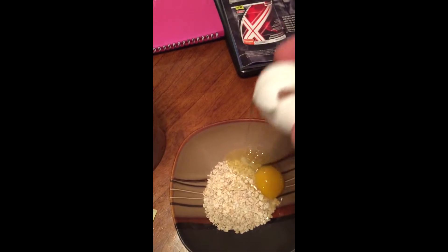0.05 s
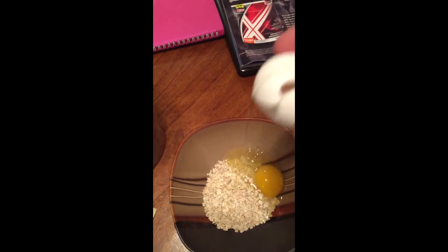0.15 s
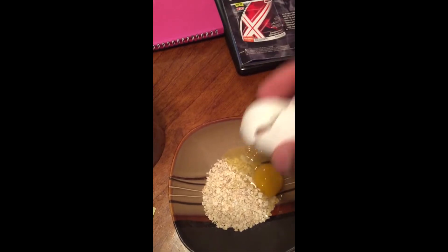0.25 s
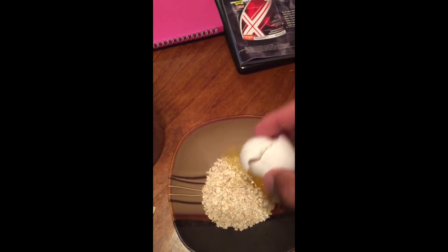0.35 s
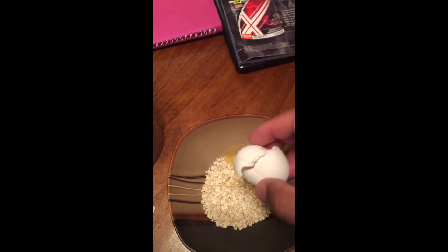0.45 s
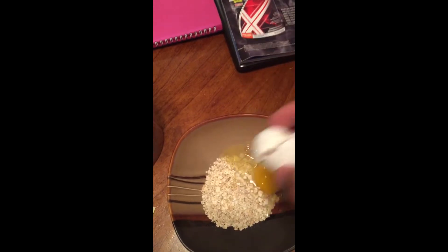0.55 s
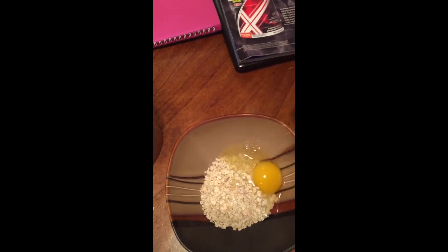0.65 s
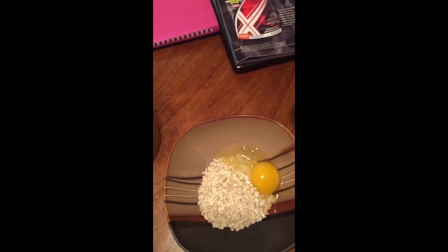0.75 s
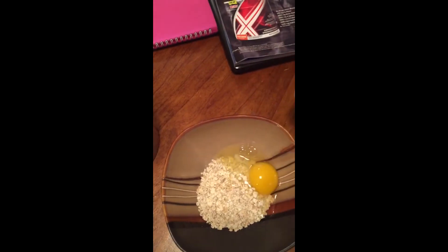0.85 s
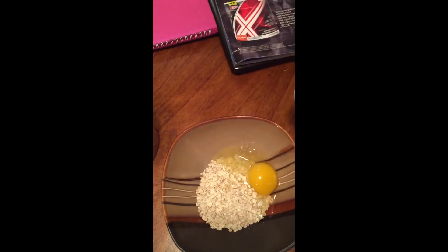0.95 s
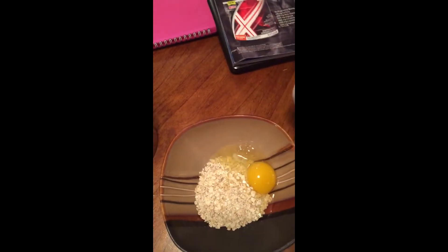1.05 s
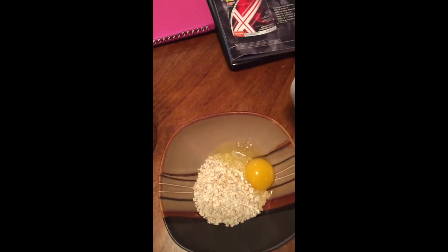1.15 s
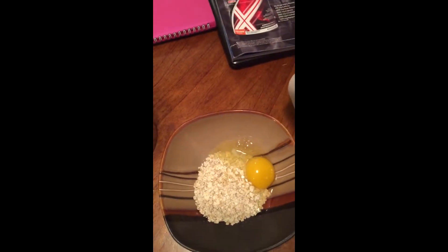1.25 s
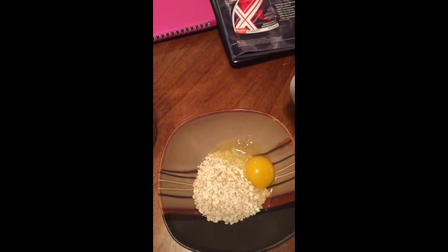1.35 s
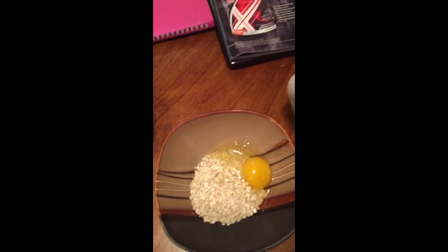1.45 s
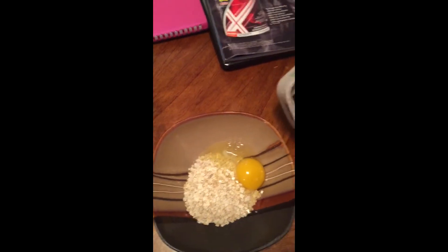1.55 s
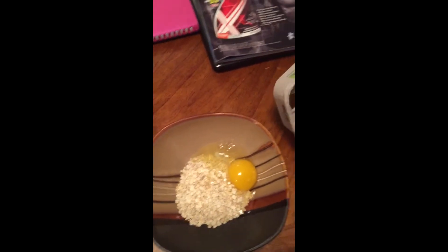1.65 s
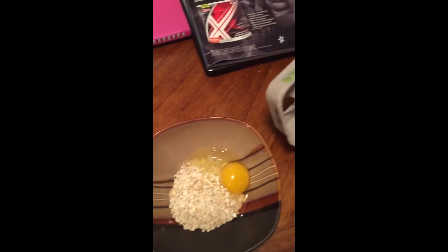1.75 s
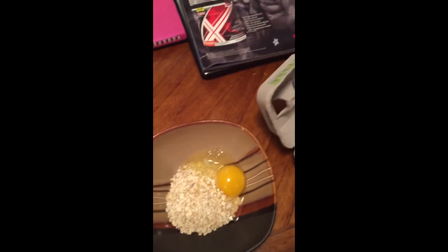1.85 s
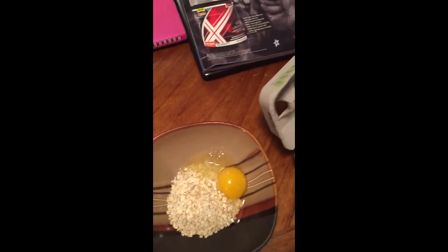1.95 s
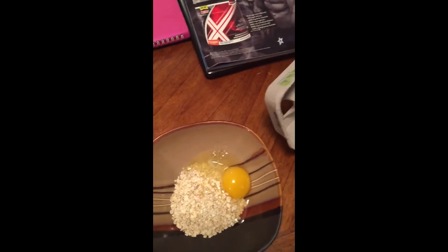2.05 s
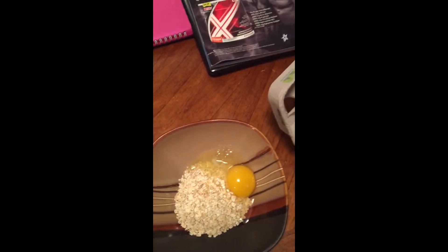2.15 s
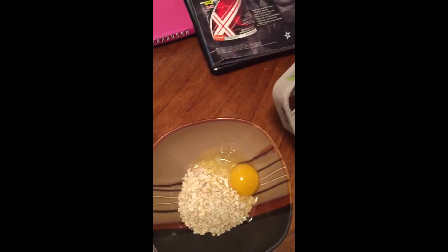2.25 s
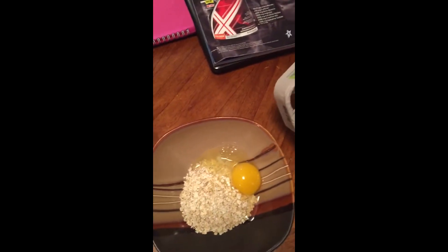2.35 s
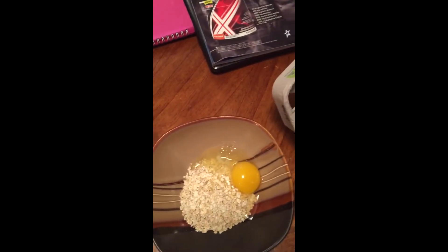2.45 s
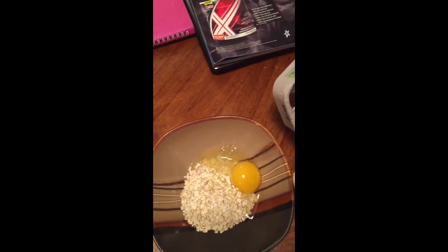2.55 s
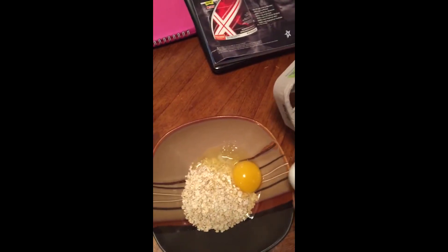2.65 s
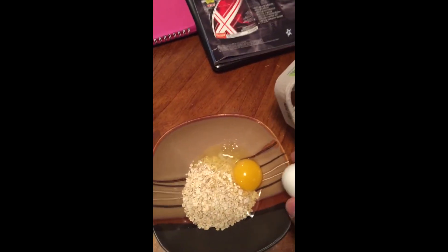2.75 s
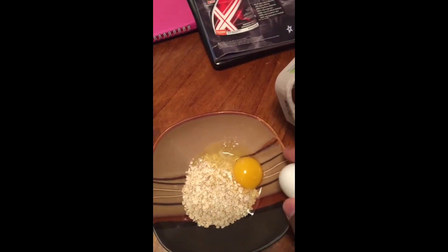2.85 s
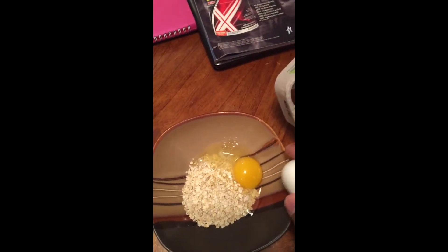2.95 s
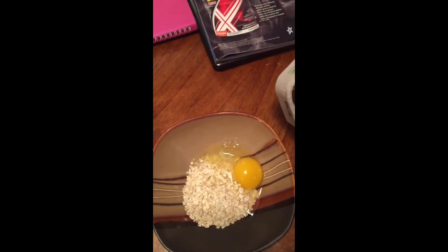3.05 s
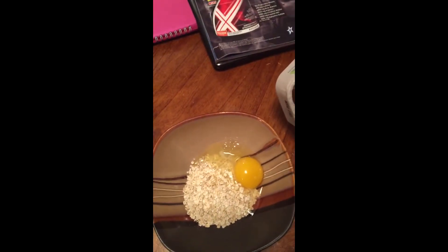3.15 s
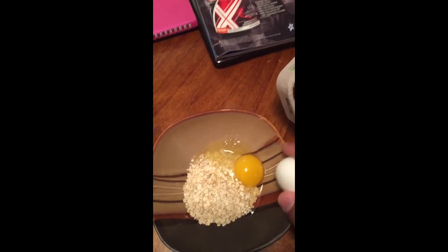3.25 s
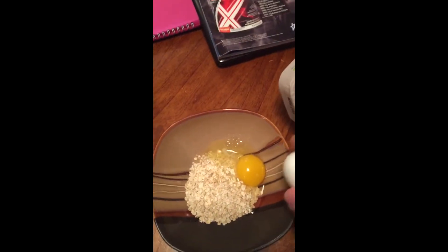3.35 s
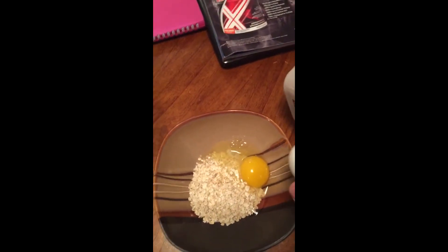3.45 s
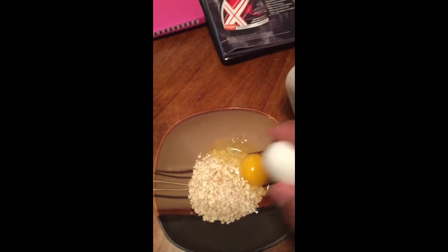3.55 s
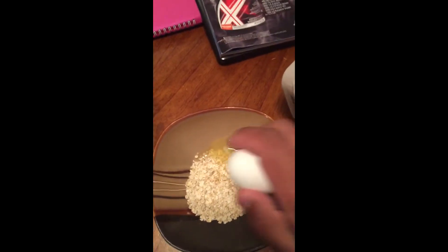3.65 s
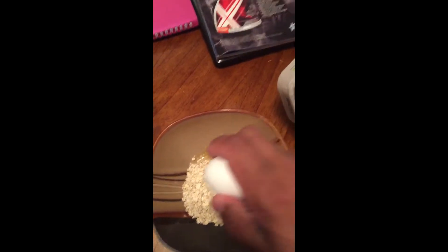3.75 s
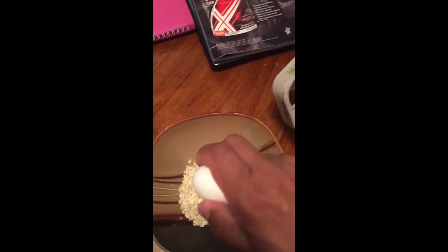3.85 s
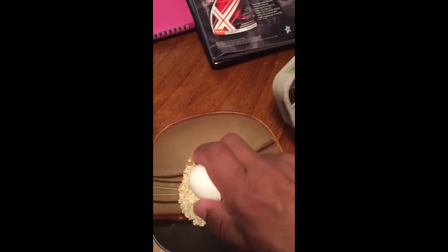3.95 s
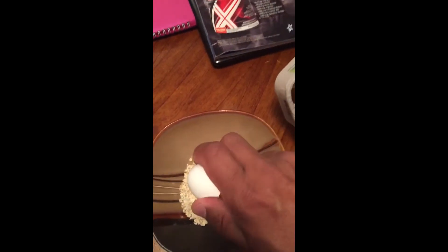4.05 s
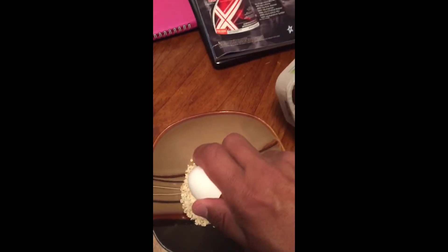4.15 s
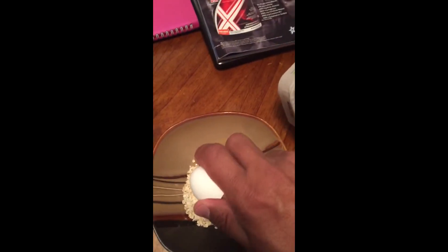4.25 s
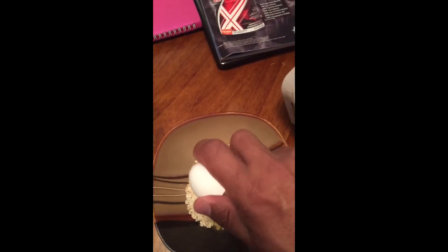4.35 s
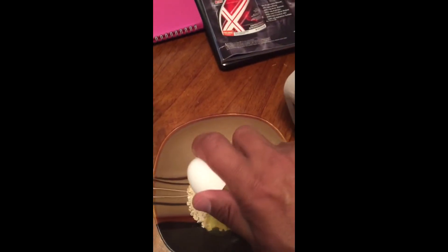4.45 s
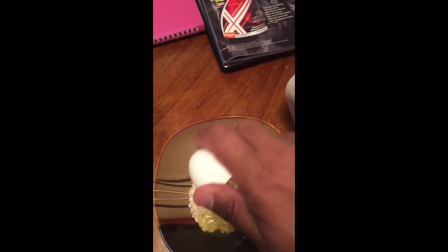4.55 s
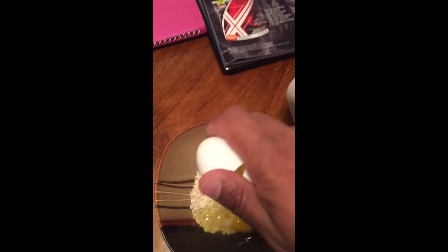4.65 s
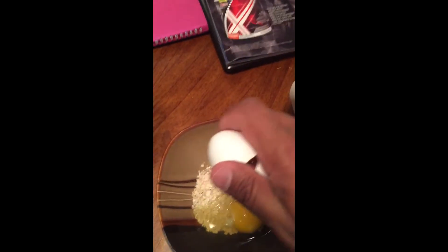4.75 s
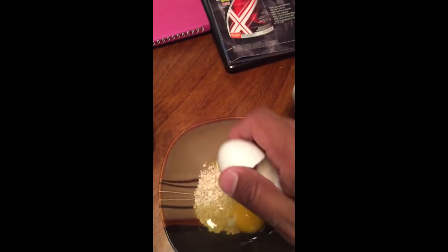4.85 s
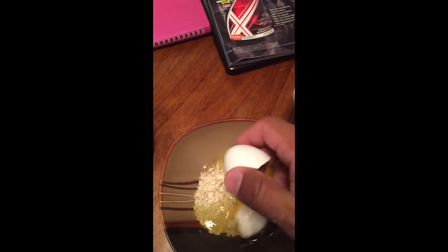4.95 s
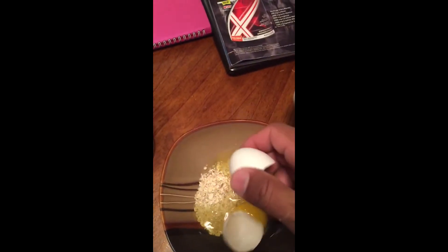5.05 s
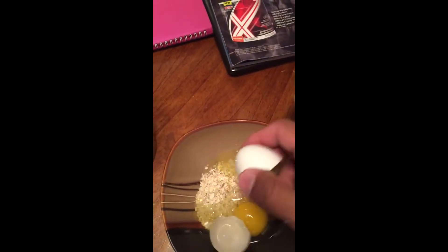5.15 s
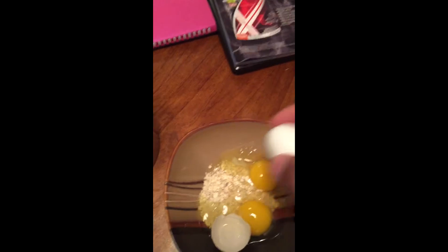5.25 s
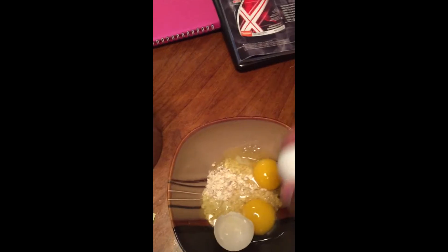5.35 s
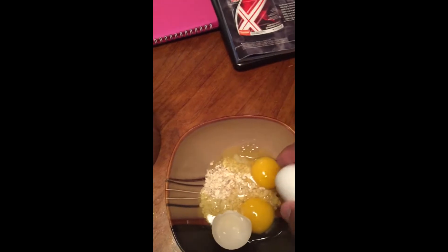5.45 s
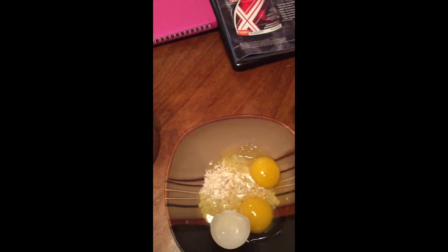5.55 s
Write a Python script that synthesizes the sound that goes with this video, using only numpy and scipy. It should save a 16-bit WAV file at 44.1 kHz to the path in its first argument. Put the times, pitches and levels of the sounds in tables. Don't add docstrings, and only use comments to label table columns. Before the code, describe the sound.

A dry shell tick, gritty carton scrape, two hard egg knocks on a ringing bowl and table, then crisp shell cracks.

```python
import sys
import numpy as np
from scipy import signal
from scipy.fft import rfft, irfft
from scipy.io import wavfile
from scipy.ndimage import uniform_filter1d

SR = 44100
rng = np.random.default_rng(int(sys.argv[2]) if len(sys.argv) > 2 else 0)


def voltage_ratio(level):
    return 10 ** (np.asarray(level, float) / 20)


def log_audio(samples):
    frames = np.atleast_2d(samples).T
    limited = np.clip(frames, -1, 1)
    pcm = np.round(limited * 32767).astype(np.int16)
    wavfile.write(sys.argv[1], SR, pcm)


N = 247048

# (frequency [Hz], density [dB per Hz])
ROOM_TONE = [(24, -21), (40, -8), (64, 1.5), (87, -30.5), (109, -5.5), (151, -7.5), (199, -5.5), (392, -17),
             (542, -11.5), (615, -17), (663, -23), (1520, -26.5), (2210, -31.5), (13400, -45.5),
             (16000, -46)]
# (frequency [Hz], width [Hz], level [dB])
FRIDGE_BANDS = [(55.9, 17, -67), (120.94, 9, -66.5), (194.2, 82, -64), (304.7, 14, -76.5), (550.7, 41, -67),
                (970, 100, -76.5), (1652, 77, -81.5)]
# (frequency [Hz], t60 [s])
ROOM_DECAY = [(150, 1), (400, 0.6), (1000, 0.32), (2500, 0.44), (6000, 0.31), (13000, 0.029)]
# (time [s], length [s], level [dB])
SKIN_SQUEAKS = [
    (1.384, 0.013, -69),
    (1.46, 0.022, -78),
    (1.634, 0.013, -66),
    (5.412, .01, -71),
]
# (frequency [Hz], density [dB per Hz])
FLAKE_COLOUR = [(710, -39.5), (1200, -2.5), (1380, -11.5), (2330, -11.5), (3050, -17.5), (4830, -9),
                (9570, -18), (14500, -12), (15500, -20)]
# (frequency [Hz], density [dB per Hz])
SKIN_COLOUR = [(3500, -9), (5700, -12.5), (6800, -11), (8000, -4.5), (10500, -13), (13000, -10.5),
               (15500, -3)]
# (time [s], rise [s], fall [s], level [dB])
FLAKE_SHOWERS = [(3.79, 0.02, .03, -64.5), (3.93, .04, 0.089, -56), (4.06, 0.077, 0.034, -54),
                 (4.15, 0.11, 0.21, -59), (4.5, 0.55, 0.11, -73.5), (4.8, .7, 0.52, -75),
                 (5.25, 0.077, 0.14, -58.5), (5.49, 0.17, 0.1, -64.5)]
# (time [s], rise [s], fall [s], level [dB])
SKIN_BRUSHES = [(.876, 0.023, .035, -60), (1.36, .012, .022, -72), (1.49, .06, .022, -74),
                (2.168, 0.074, 0.053, -66), (2.29, 0.12, .16, -74), (2.41, 0.052, .04, -66),
                (2.904, .03, 0.025, -69)]
# (time [s], rise [s], fall [s], level [dB])
CARTON_STROKES = [
    (1.4, 0.11, 0.068, -67),
    (1.514, 0.054, 0.039, -54),
    (1.6, 0.13, 0.14, -53),
    (1.748, 0.074, 0.028, -47),
    (1.802, 0.069, 0.022, -44.5),
]
# (frequency [Hz], density [dB per Hz])
PULP_COLOUR = [(290, -13), (500, -13.5), (891, -4), (1100, -7.5), (1220, -2.5), (1560, -7), (1770, -12),
               (1910, -8), (5000, -17), (6500, -18), (11000, -120)]
# (frequency [Hz], level [dB])
CUP_HOLLOWS = [(900, 1), (1250, 3), (1800, 0), (2300, -2), (2800, 0), (3300, -1), (3800, -2), (4800, -8),
               (6300, -11)]
# (time [s], table level [dB], bowl level [dB], splinter level [dB], contact [ms])
KNOCK_ONE = [(2.823, -24, -56.5, -28.5, .35), (2.8255, -11.5, -37, -64, .45), (2.8581, -21, -47, -63, 0.9),
             (2.905, -45, -53, -65, 1.), (2.9315, -38, -70, -75, 1.), (3.003, -42, -54, -72, 0.6),
             (3.012, -36, -66, -75, .8), (3.033, -39, -68, -80, .8), (3.0519, -40, -64, -94, .8)]
KNOCK_TWO = [(3.335, -20, -6, 2.5, 0.26), (3.341, -13.5, -26.5, -8.5, 0.22), (3.367, -45, -41, -24.5, 0.53),
             (3.382, -13.5, -53.5, -41, 0.93), (3.385, -9.5, -55, -43, 0.26),
             (3.397, -21.5, -59.5, -33, 0.21), (3.415, -13.5, -54, -35.5, 0.54),
             (3.49, -34.5, -53.5, -48, 0.46)]
LIGHT_TOUCHES = [(5.2, -54, -32, -60, .2), (.953, -35, -75, -36, .2), (.973, -41, -75, -42, .4),
                 (3.96, -48, -85, -80, .5)]
# (frequency [Hz], level [dB], t60 [s])
TABLE_ONE = [(150, -10, .16), (205, -7, .2), (291, 3, .31), (340, -14, .1), (436, -16, .1), (544, -10, .14),
             (620, -14, .1), (700, -16, .08), (867, -6, .1), (915, -11, .08), (991, -8, .1),
             (1040, -6, .06), (1230, -12, .07), (1518, -12, .08)]
TABLE_TWO = [(205, -10, .25), (245, -11, .25), (293, -2, .29), (310, -7, .3), (361, -8, .2), (404, -7, .2),
             (603, -11, .12), (655, -6, .11), (775, -9, .06), (875, -5, .08), (960, -4, .06),
             (1035, 0, .07), (1190, -8, .05), (1400, -11, .05)]
# (frequency [Hz], level [dB], t60 [s])
BOWL_MODES = [(990, -9, .22), (1940, -5, .15), (1985, -2, .3), (3271, -1, .22), (3286, -8, .3),
              (3402, -14, .15), (5040, -7, .22), (5105, -12, .25), (5195, -7, .04), (6115, -10, .05),
              (6975, -8, .07), (7924, -13, .05), (9400, -14, .06)]
# (frequency [Hz], density [dB per Hz])
RUMBLE_COLOUR = [(70, -30), (130, -6), (280, -4), (600, -6), (1000, -2.5), (1600, -13.5), (2300, -21),
                 (4000, -50)]
# (from [s], to [s], level [dB])
BOWL_STILLED = [(2.839, 2.995, -7), (3.042, 3.3, -16), (3.354, 5.05, -10.5), (5.336, 5.7, -13.5)]
# (time [s], level [dB], treble re crack [dB], hollow re crack [dB], length [ms])
CRACKS_DROP = [(0.184, -64, 6, -2, 2.4), (0.876, -50.5, 10, 3, 1.8), (0.8898, -50.5, 0, 5.5, 4.9),
               (0.952, -29, 14.5, 12.5, 0.53), (0.954, -26, 4.5, 10, 1.4), (0.9628, -32, -4, 7, 8.6),
               (0.9709, -29, -33, 5, 7.4), (0.9719, -44, 13, 8, 5.3), (0.9812, -38, -2, 7, 4.8),
               (0.9891, -40, -1, 9, 20), (1.045, -54, -17.5, 2, 4.0), (1.2657, -42.5, 3.5, -2, 4.6),
               (1.278, -56, -9, 2, 6.6), (1.359, -58, 0, 0, 1.5), (1.5252, -40.5, 1, -3, 1.7),
               (1.8, -46, -12, 5.5, 0.56), (1.8088, -49, 2, 10, 0.98), (2.0146, -54.5, -9, 3, 1.8),
               (3.3127, -56, 11, -5, 0.8), (3.3175, -50.5, -5, 2, 12)]
CRACKS_CATCH = [(1.501, -39, -11, -10, 11), (1.514, -37.5, -8, -21, 12.3), (1.5612, -46, -7, -8, 7.7),
                (1.576, -45, -4, -6, 3.6), (1.6, -50, -15, -5, 3), (1.62, -52, -10, 1, 5.7),
                (1.691, -64, -10, 10, 2.8), (1.7112, -55, -1, -8, 3), (1.7383, -47, -9, 10, 2.2),
                (1.763, -42, -3, -4, 2), (1.797, -43, -4, -8, 2)]
CRACKS_PRESS = [(3.7766, -32, 4, -33, 0.5), (3.784, -49.5, 3, -5, 1.2), (3.7867, -42, 4.5, -5, 1.4),
                (3.8675, -30.5, 4.5, -21, 0.94), (3.9015, -23, 2.5, -37, 2.4), (3.9053, -45, -5, -27, 2.5),
                (3.9173, -26, 8.5, -25, 0.8), (3.921, -21, -4, -32, 1.15), (3.9321, -32, 2.5, -10, 2.2),
                (3.9388, -31, 12, -20, 0.97), (3.943, -39, 8.5, -22, 2.4), (3.9508, -36, 8, -14, 2.5),
                (3.9565, -40.5, 2, -12, 1.3), (3.9606, -26.5, 6.5, -13, .8), (3.9705, -46, 8, -11, 4.7),
                (3.992, -41, 10, -20, 1.5), (4.0195, -31, 3.5, -15, 2.2), (4.052, -40, 3, -7.5, 2.2),
                (4.0588, -38.5, 13.5, -5, 4.4), (4.064, -25.5, 7, -11, 0.84), (4.0713, -48, 11, 0, 4.2)]
CRACKS_SPLIT = [(4.1147, -7.5, 5, -22.5, 0.66), (4.1203, -32.5, 11, 0, 3.7), (4.1314, -35, 14.5, 3, 2.9),
                (4.1516, -34, 10, 3, 2.2), (4.1566, -29.5, 12.5, 5.5, 3), (4.168, -31.5, 6.5, 3.5, 0.75),
                (4.1784, -48, 12, 11, 2.5), (4.189, -25.5, 7, -9, 1.4), (4.2039, -27, -1, -8, 0.72),
                (4.2149, -23.5, -23, -11, 1.7), (4.217, -24.5, -11, -9, 4.6), (4.2222, -18, -9, -13, 2.2),
                (4.2305, -21, -4, -17, 1.5), (4.242, -36, -4, -5, 0.6), (4.288, -58, 13, 10, 8.4),
                (4.302, -47, -5, -8, 1.3), (4.315, -20.5, -8, 0, 0.63), (4.325, -45.5, -7, 8, 3.8),
                (4.426, -55, -3, 8, 5.2), (4.4341, -52.5, 6.5, 12.5, 4.9), (4.4397, -50.5, -18, -12, 2.4),
                (4.471, -41.5, -18, -17, 0.77), (4.48, -60, -7, -1, 1.9), (4.4936, -51, 10, -3, 3.5),
                (4.502, -46.5, -25.5, -7, 4.8)]
CRACKS_PART = [(4.5215, -50.5, -4, -12, 0.68), (4.538, -61, -8, 0, 2.4), (4.6222, -38, -6, -13, 0.85),
               (4.632, -47, 1.5, -11, 1.95), (4.726, -55, 10, 3.5, 3.6), (4.745, -20, 7.5, -5, 1.06),
               (4.753, -48, 14, -14, 2.6), (4.776, -36.5, 3.5, 5, 2.1), (4.791, -35.5, -6, 8.5, 4.5),
               (4.8018, -48, -2.5, 1, 3.4), (4.8376, -41.5, 1.5, -7, 1.9), (4.8588, -59, 8.5, 5, 4.5),
               (4.8964, -59, 13, 7, 1.6), (5.0717, -58, 5.5, -2, 2), (5.2006, -14, -4.5, -18.5, 1.2),
               (5.263, -40.5, -6, -0.5, 1.1), (5.2726, -52.5, 9, 3, 1.1), (5.3005, -44.5, 10, 0, 0.33),
               (5.3121, -41.5, -11, -13, 2.4), (5.3278, -48, 5, -1, 4.5), (5.347, -37, -20, -11, 1.2),
               (5.3806, -62, 13, -4, 1.1), (5.4677, -28, 6.5, -16, 0.81), (5.503, -50.5, -1, -12, 2.7)]
# (time [s], frequency [Hz])
WALL_NOTE = [(1.0, 4700), (1.53, 3300), (3.776, 3900), (3.867, 3800), (3.901, 3620), (3.92, 3300),
             (3.99, 3350), (4.02, 4600), (4.062, 3470), (4.114, 3950), (4.23, 3730), (4.43, 4100),
             (4.62, 3200), (4.745, 5700), (4.79, 2800), (5.2, 6200), (5.348, 3000), (5.468, 5760)]
# (time [s], frequency [Hz])
HOLLOW_NOTE = [(.88, 1220), (.952, 1690), (.954, 1137), (1.1, 1030), (1.27, 1540), (1.36, 1798),
               (3.8, 1600), (4.07, 1530), (4.11, 1117), (4.25, 1050), (4.31, 1308), (4.7, 1686),
               (5.0, 1620), (5.6, 1923)]


def unit(x):
    return x / np.sqrt(np.mean(x ** 2))


def peak(x, db):
    return x * voltage_ratio(db) / np.max(np.abs(x))


def colour(x, table):
    hz, db = np.transpose(table)
    log_hz = np.log(np.arange(len(x) // 2 + 1) * SR / len(x) + 1)
    gain = voltage_ratio(np.interp(log_hz, np.log(hz), db, left=-90, right=-90))
    return irfft(rfft(x) * gain, len(x))


def band(x, lo_hz, hi_hz):
    edges = [lo_hz, min(hi_hz, .45 * SR)]
    return signal.sosfilt(signal.butter(2, edges, "band", fs=SR, output="sos"), x)


def ring(x, hz, t60):
    pole = np.exp((2j * np.pi * hz - np.log(1000) / max(t60, 1e-3)) / SR)
    return signal.lfilter([1], [1, -pole], x).imag


def add(track, s, sound):
    i = int(s * SR)
    track[i:i + len(sound)] += sound[:N - i]


def grit(rate, spread_db):
    draw = rng.random((N, 3))
    slips = (draw[:, 0] < rate / SR) * np.sign(draw[:, 1] - .5)
    return unit(slips * voltage_ratio(-spread_db * np.log(draw[:, 2] + 0.02)))


def walk(rate):
    k = int(SR / rate)
    steps = np.repeat(rng.standard_normal(N // k + 1), k)
    return unit(uniform_filter1d(steps, k)[:N])


def swells(rows):
    t = np.arange(N) / SR
    return sum(voltage_ratio(db - 20 * np.maximum((s - t) / rise, (t - s) / fall)) for s, rise, fall, db in rows)


def kitchen():
    tone = unit(colour(rng.standard_normal(N), ROOM_TONE))
    out = voltage_ratio(-58.5) * tone * voltage_ratio(.6 * walk(0.76))
    for hz, width_hz, db in FRIDGE_BANDS:
        noise = band(rng.standard_normal(N), hz - width_hz / 2, hz + width_hz / 2)
        out += voltage_ratio(db + 0.46 * walk(0.6)) * unit(noise)
    hum = np.sin(2 * np.pi * 119.6 * np.arange(N) / SR)
    return out + voltage_ratio(-62.5 + .8 * walk(3)) * unit(hum)


def room(x):
    t = np.arange(SR // 2) / SR
    hz, t60 = np.transpose(ROOM_DECAY)
    tail = np.zeros(len(t))
    for f in 100 * 2 ** np.arange(0, 7.4, .5):
        fade = voltage_ratio(-60 * t / np.interp(np.log(f), np.log(hz), t60))
        tail += band(rng.standard_normal(len(t)), f / 1.19, f * 1.214) * fade
    tail *= 1 - np.exp(-(t / 0.0051) ** 2)
    tones = rfft(tail)
    broad = uniform_filter1d(np.abs(tones), size=300)
    fine = uniform_filter1d(np.abs(tones), size=20)
    tail = irfft(tones * broad / fine, len(t))
    return signal.fftconvolve(x, tail / np.sqrt(np.sum(tail ** 2)))[:N]


def squeaks():
    t = np.arange(N) / SR
    swell = sum(voltage_ratio(db) * np.exp(-((t - s) / length) ** 2) for s, length, db in SKIN_SQUEAKS)
    return swell * unit(band(rng.standard_normal(N), 5540, 5900))


def crumble():
    flakes = unit(colour(grit(3000, 2.8) * voltage_ratio(4.8 * walk(100)), FLAKE_COLOUR))
    skin = unit(colour(rng.standard_normal(N), SKIN_COLOUR))
    return flakes * swells(FLAKE_SHOWERS) + skin * swells(SKIN_BRUSHES)


def scrape():
    slips = grit(5000, 2.5) * voltage_ratio(2.6 * walk(39.56))
    hollows = np.zeros(N)
    for hz, db in CUP_HOLLOWS:
        hollows += voltage_ratio(db + 3.5 * walk(30.0)) * unit(band(slips, hz / 1.06, hz * 1.06))
    pulp = unit(unit(colour(slips, PULP_COLOUR)) + .5 * unit(hollows))
    stroke = swells(CARTON_STROKES)
    effort = stroke / np.max(stroke)
    hiss = voltage_ratio(-10) * np.sqrt(effort) * unit(band(slips, 4700, 14300))
    return stroke * (pulp + hiss)


def stilling():
    t = np.arange(N) / SR
    settle_s = 0.008
    gain = voltage_ratio(sum(db * ((t > start) & (t < end)) for start, end, db in BOWL_STILLED))
    return uniform_filter1d(gain, int(settle_s * SR))


def knocks(blows, table, rumble_db, bowl_tilt_db):
    thuds, china, t = np.zeros(N), np.zeros(N), np.arange(22000) / SR
    chance = rng.standard_normal((len(blows), 60))
    noise = rng.standard_normal((len(blows), 2, len(t)))
    click = 1. * (t == 0)
    for (s, table_db, bowl_db, splinter_db, ms), luck, (hum, fuzz) in zip(blows, chance, noise):
        push = np.sin(np.pi * np.clip(t * 1000 / max(ms, .05), 0, 1)) ** 2
        wood = np.zeros(len(t))
        for (hz, db, t60), u in zip(table, luck):
            sign = np.sign(u) if hz > 330 else 1
            wood += sign * voltage_ratio(db + 1.7 * u) * ring(push, hz, t60)
        wood = band(wood, 180, 5600)
        rumble_fade = np.exp(-t / 0.017) + 0.15 * np.exp(-t / 0.093)
        rumble = colour(hum, RUMBLE_COLOUR) * (1 - np.exp(-t / 0.00055)) * rumble_fade
        splinters = band(fuzz * (np.exp(-t / 0.0019) + 0.24 * np.exp(-t / 0.0076)), 1100, 13000)
        thud = peak(wood, table_db) + peak(rumble, table_db + rumble_db)
        add(thuds, s, thud + peak(splinters, splinter_db))
        bowl = np.zeros(len(t))
        for (hz, db, t60), u in zip(BOWL_MODES, luck[30:]):
            bowl += voltage_ratio(db + u + bowl_tilt_db * np.log2(hz / 3000)) * ring(click, hz, t60)
        add(china, s, peak(bowl, bowl_db))
    return np.array([thuds, china * stilling()])


def cracks():
    out = np.zeros(N)
    t = np.arange(2600) / SR - 44 / SR
    rows = np.array([*CRACKS_DROP, *CRACKS_CATCH, *CRACKS_PRESS, *CRACKS_SPLIT, *CRACKS_PART])
    times, ms = rows[:, 0], rows[:, 4:]
    fuzz = rng.standard_normal((len(rows), 2600))
    rise_s, creep, creep_s, snap = .0004, .04, .007, 4.
    fall = np.exp(-t * 1000 / np.maximum(1.7 * ms, .2)) + creep * np.exp(-t / creep_s)
    tear = fuzz * np.where(t < 0, np.exp(t / rise_s), fall) + snap * (t == 0)
    wall_hz = np.interp(times, *np.transpose(WALL_NOTE)) * (1 + .03 * fuzz[:, 1])
    hollow_hz = np.interp(times, *np.transpose(HOLLOW_NOTE)) * (1 + .03 * fuzz[:, 0])
    wall = np.array([ring(x, hz, .004) for x, hz in zip(tear, wall_hz)])
    bodies = band(band(tear + .11 * wall, 2300, 7800), 2300, 7800)
    trebles = band(tear, 4500, 11000)
    hollows = band(np.array([ring(x, hz, .014) for x, hz in zip(tear, hollow_hz)]), 1100, 2500)
    for (s, db, treble_db, hollow_db, _), body, treble, hollow in zip(rows, bodies, trebles, hollows):
        crack = peak(body, db - 1.0)
        crack += peak(treble, db + treble_db - 0.5)
        crack += peak(hollow, db + hollow_db - 3.5)
        add(out, s + t[0] - .0002, crack)
    return out


def scene():
    hands = cracks() + scrape() + crumble()
    blows = knocks(KNOCK_ONE, TABLE_ONE, -10.0, -1.6)
    blows += knocks(KNOCK_TWO, TABLE_TWO, -3.0, -0.38)
    blows += knocks(LIGHT_TOUCHES, TABLE_TWO, 3.6, 0.35)
    wood, china = blows
    knock_send = voltage_ratio(-14.5) * (band(wood, 330, SR / 2) + voltage_ratio(-6) * china)
    echo = room(knock_send + voltage_ratio(-18.5) * hands)
    return (hands + wood + china + echo + kitchen() + squeaks())[None]


def roll_off(x):
    return signal.sosfilt(signal.butter(12, 17140, fs=SR, output="sos"), x)


def record(dry):
    ceiling, top_hz = .68, 15200
    x = dry - .5 * band(dry, 10200, 10900)
    x = x / (1 + (np.abs(x) / ceiling) ** 4) ** .25
    x = signal.sosfilt(signal.cheby2(8, 27, top_hz + 500, fs=SR, output="sos"), x)
    return roll_off(x)


dry = scene()
out = record(dry)
log_audio(out)
```